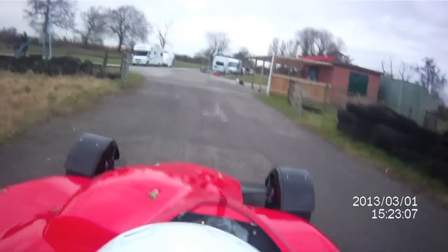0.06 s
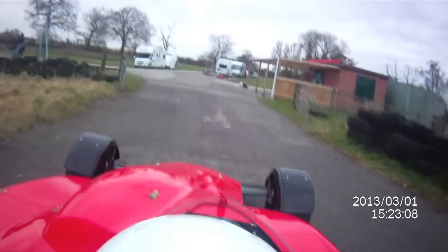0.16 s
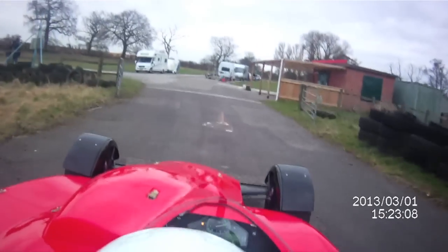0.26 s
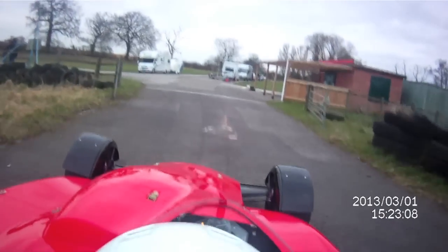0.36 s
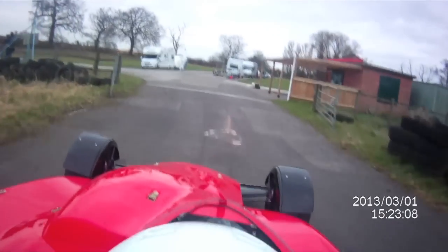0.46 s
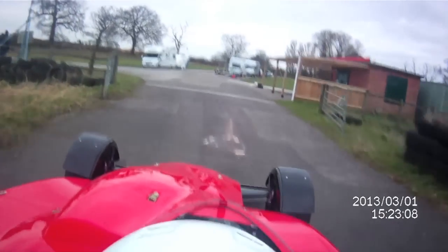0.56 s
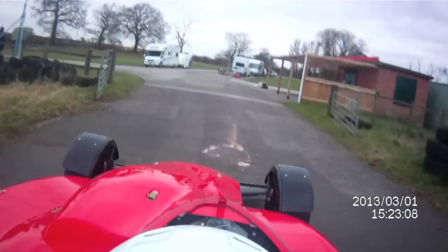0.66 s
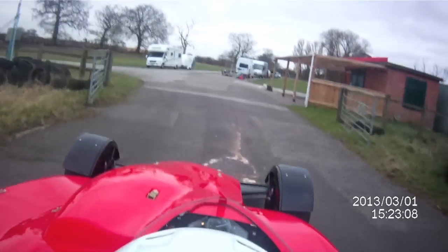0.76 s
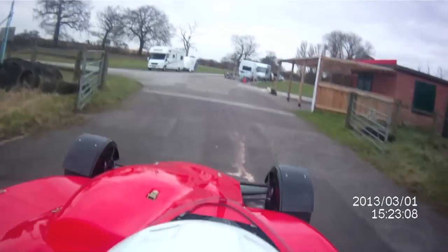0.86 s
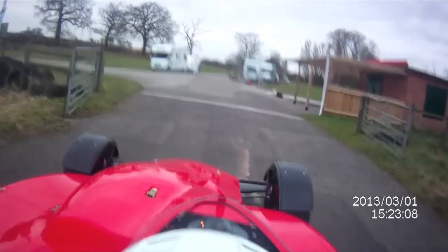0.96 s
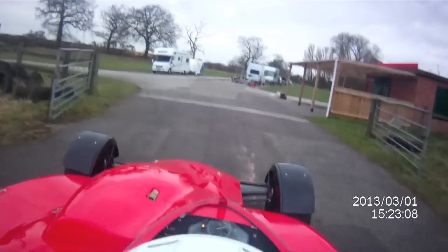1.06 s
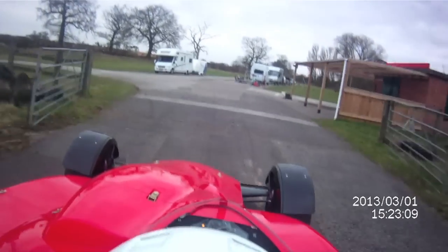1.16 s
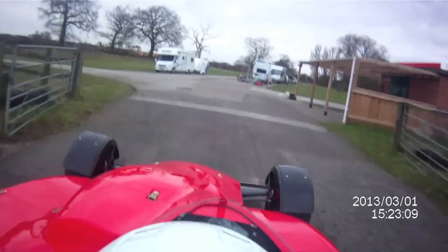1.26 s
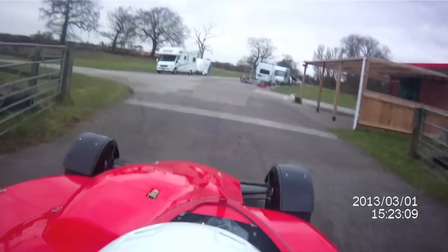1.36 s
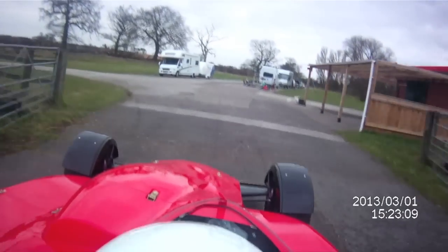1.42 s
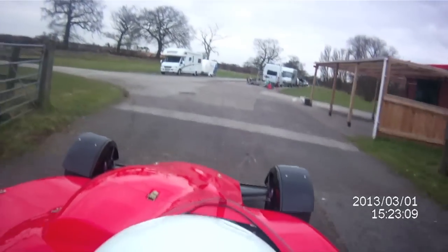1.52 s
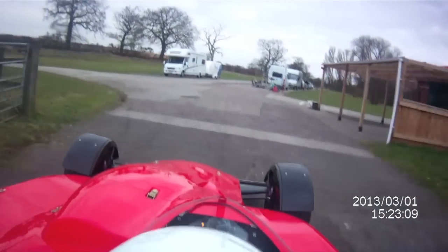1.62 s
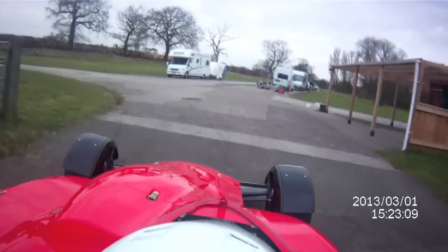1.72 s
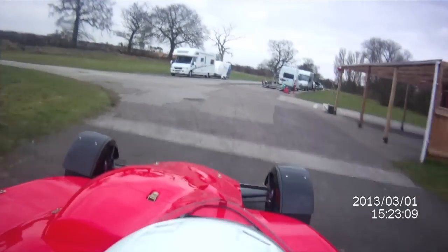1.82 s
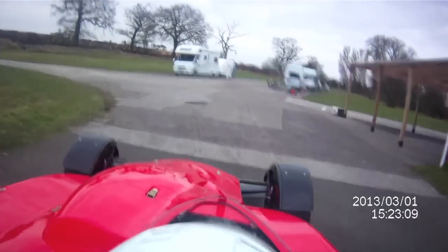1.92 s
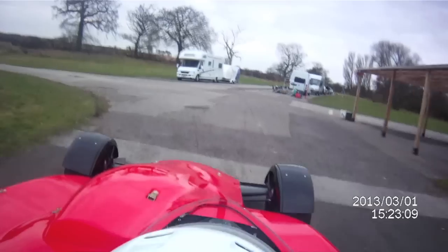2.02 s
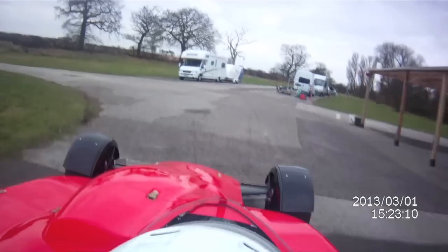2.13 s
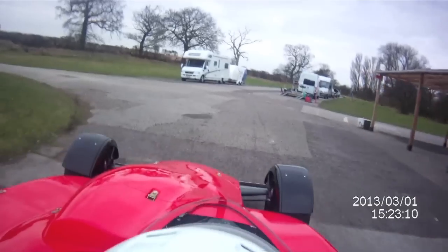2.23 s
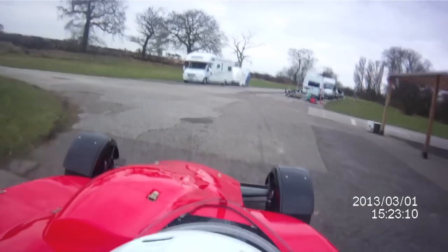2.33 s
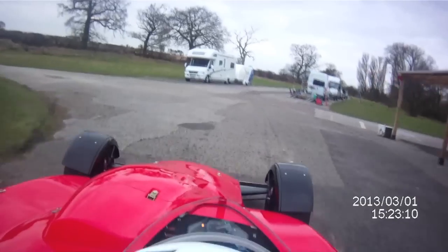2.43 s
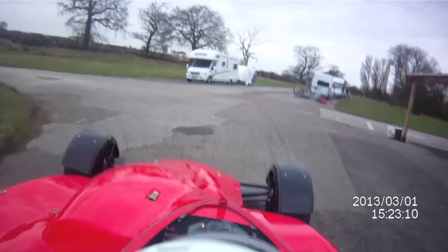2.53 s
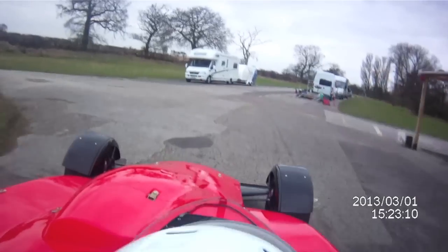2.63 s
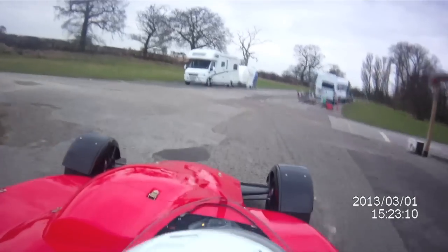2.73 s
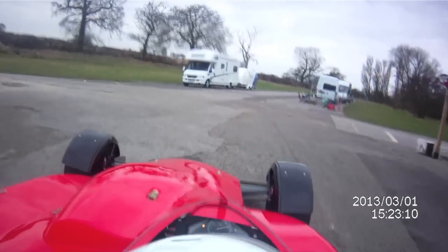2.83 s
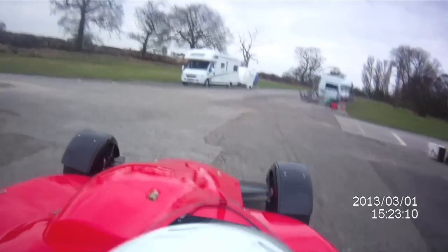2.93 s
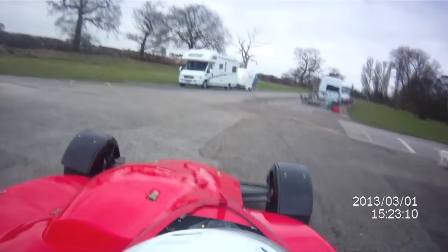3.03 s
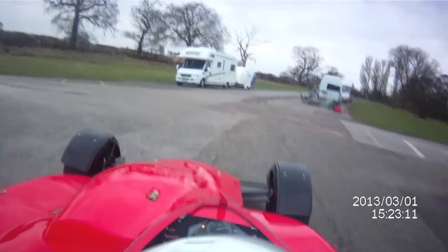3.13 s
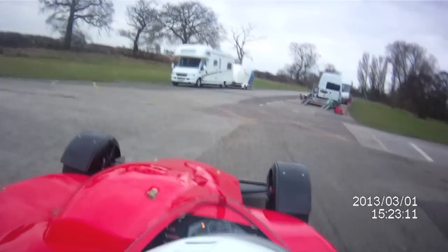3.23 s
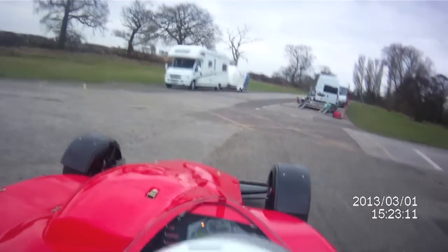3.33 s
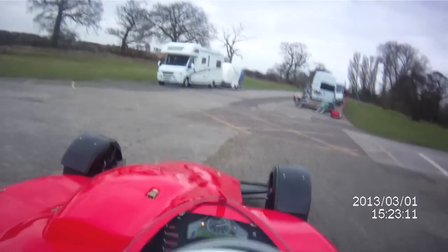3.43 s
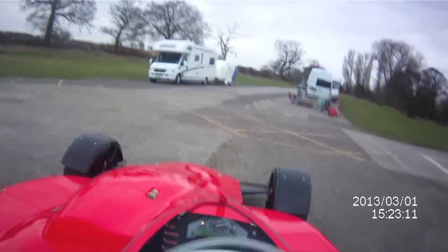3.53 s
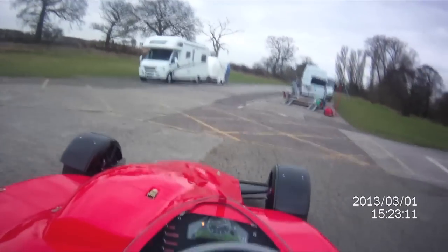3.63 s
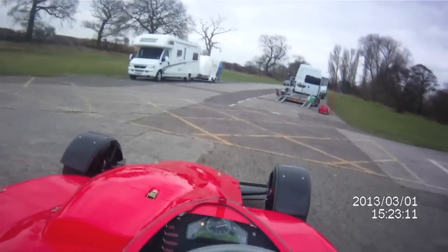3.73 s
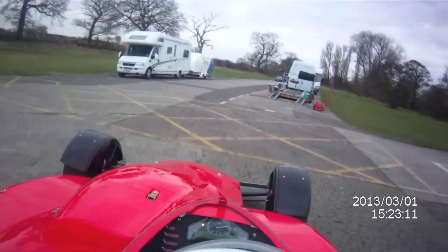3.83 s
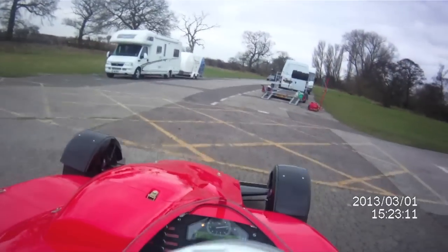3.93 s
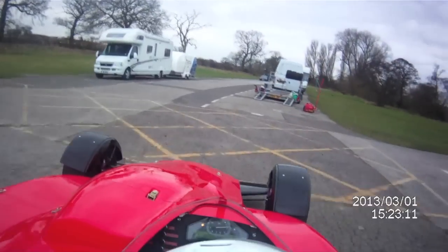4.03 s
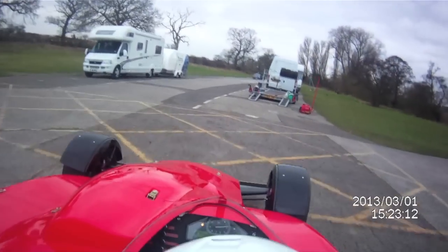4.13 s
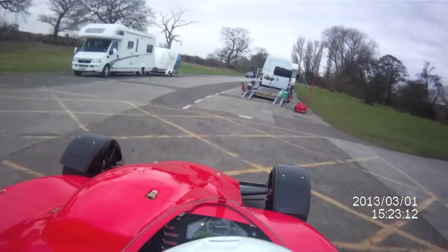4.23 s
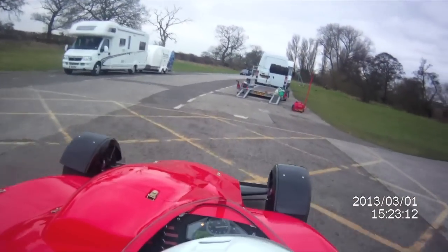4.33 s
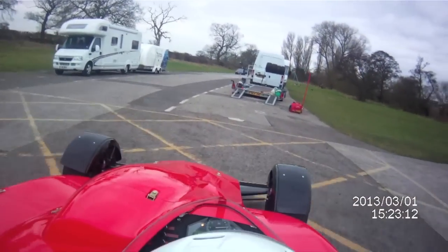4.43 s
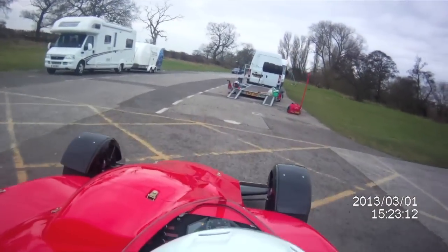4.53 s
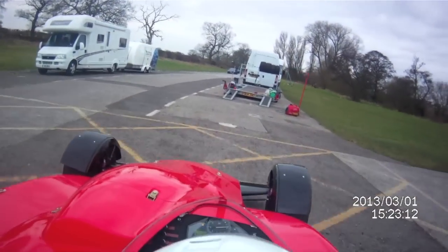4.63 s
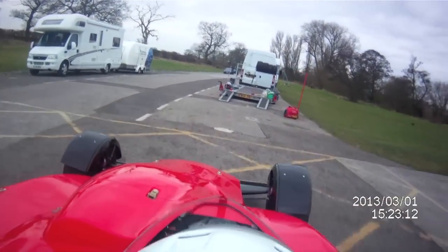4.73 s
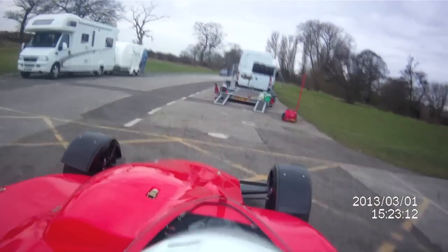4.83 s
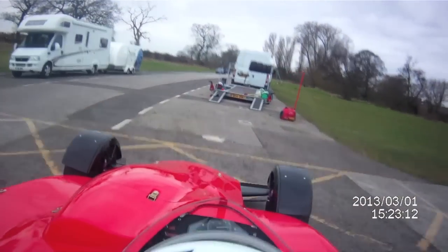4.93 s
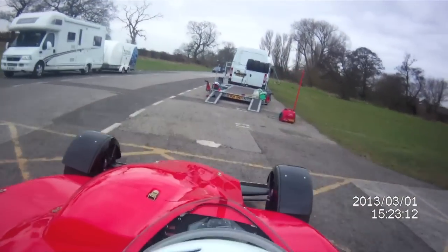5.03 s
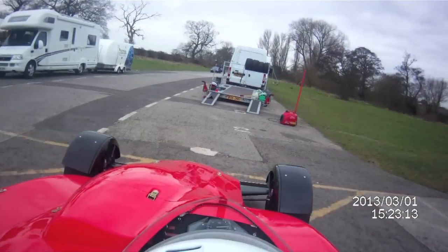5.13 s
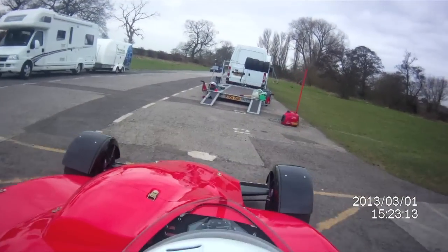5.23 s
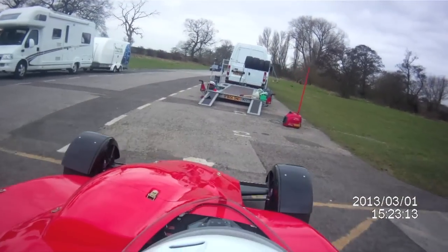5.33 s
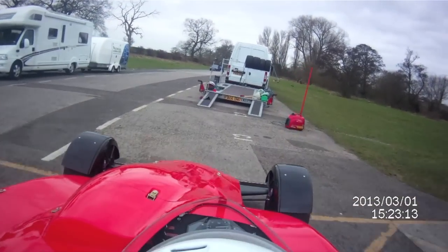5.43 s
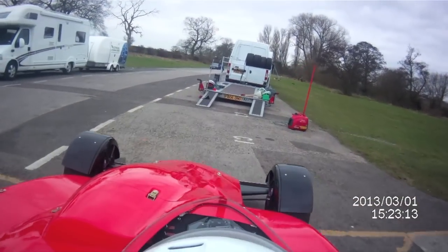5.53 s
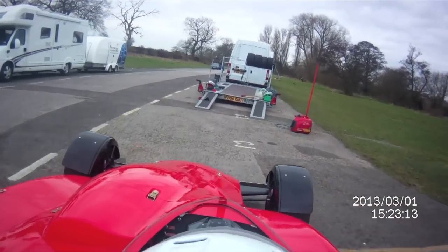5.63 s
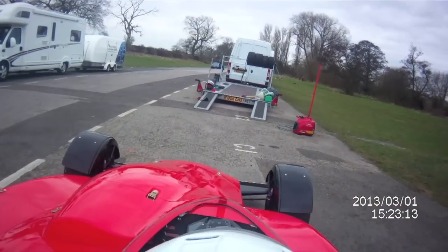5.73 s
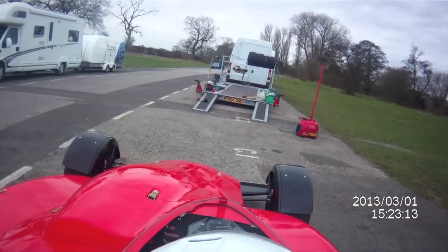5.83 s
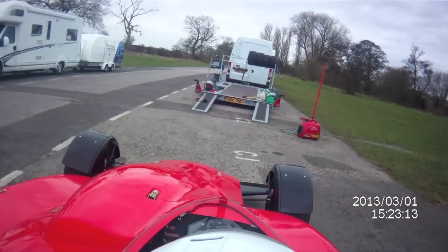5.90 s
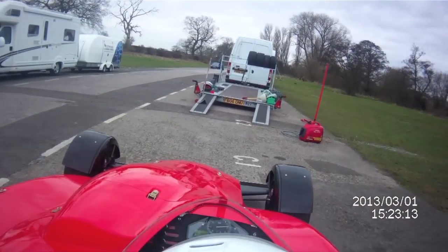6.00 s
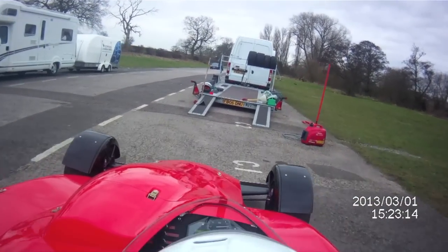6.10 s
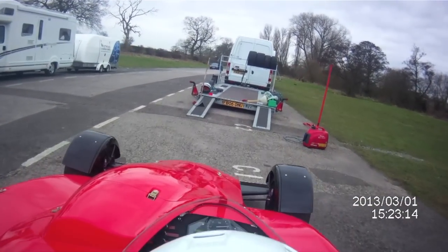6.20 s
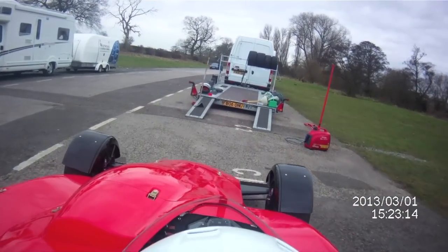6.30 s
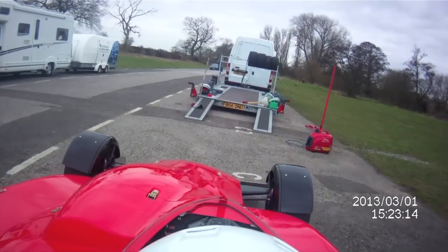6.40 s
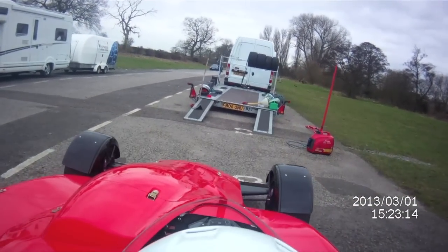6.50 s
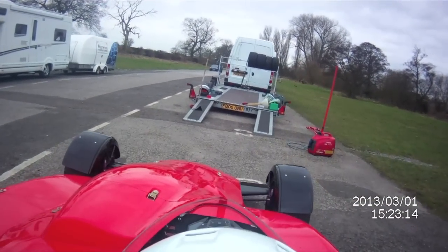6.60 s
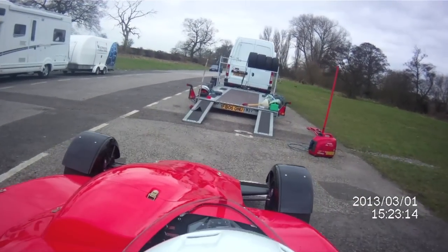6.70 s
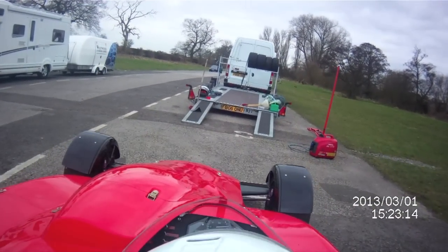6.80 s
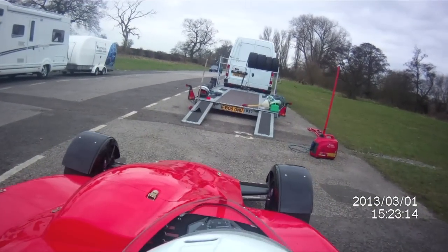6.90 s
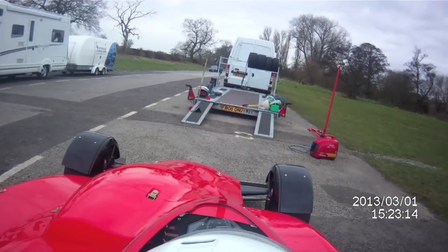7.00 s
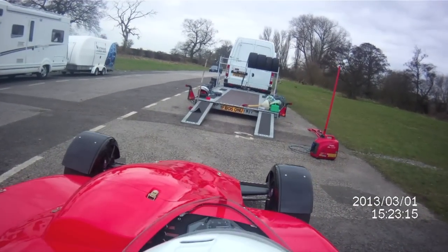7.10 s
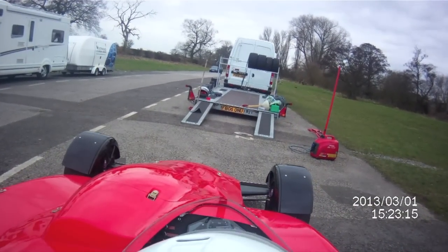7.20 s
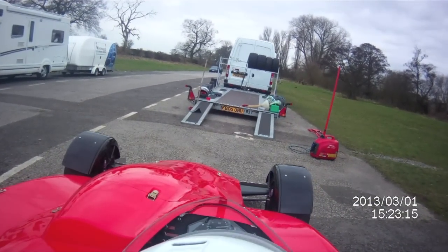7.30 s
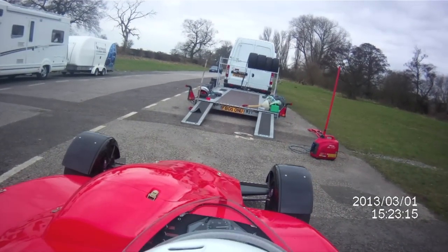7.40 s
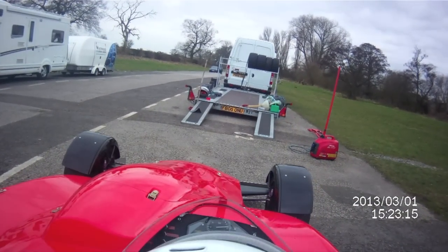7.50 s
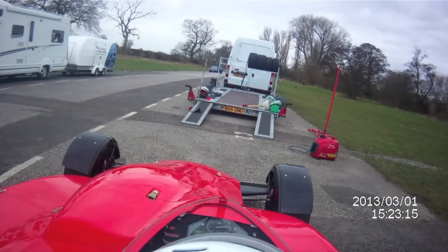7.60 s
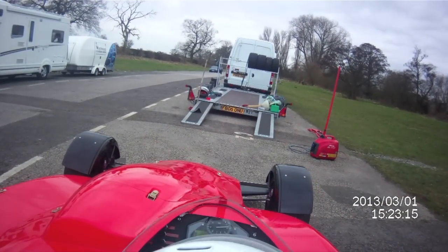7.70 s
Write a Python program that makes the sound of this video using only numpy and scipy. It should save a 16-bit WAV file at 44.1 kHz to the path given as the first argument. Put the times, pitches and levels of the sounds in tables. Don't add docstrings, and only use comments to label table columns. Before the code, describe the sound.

Heard through a small camera bolted to an open racing car outdoors: dense, gritty bracket rattle and sharp irregular knocks, some clipping, over a low exhaust hum and faint gear whine. Near the middle the engine briefly revs, drops and cuts out. The car coasts with rapid light ticking and fading tyre rumble, brakes with a dull judder, and settles into faint clicks and hiss.

```python
import sys
import numpy as np
from scipy import signal
from scipy.fft import rfft, irfft
from scipy.io import wavfile
from scipy.ndimage import uniform_filter1d

SR = 44100
rng = np.random.default_rng(int(sys.argv[2]) if len(sys.argv) > 2 else 0)


def rack_gain(trim_db):
    fader = np.asarray(trim_db, float)
    return 10 ** (fader / 20)


def to_wav(sig):
    pcm = np.clip(np.atleast_2d(sig), -1, 1) * 32767
    pcm = np.round(pcm).astype(np.int16)
    wavfile.write(sys.argv[1], SR, pcm.T)


N = 341775
TIME = np.arange(N) / SR

# mode_hz, width_hz, level_db
BRACKET = [(1542, 150, -24), (1908, 61, -3), (1976, 50, 1), (2037, 86, 0), (2126.5, 32, -4),
           (2304, 220, -10.5)]
# mode_hz, width_hz, level_db
CHASSIS = [(279, 82.5, -0.5), (319.4, 41, 8), (397, 80, -2)]
# mode_hz, width_hz, level_db
PANELS = [(521, 81, -12), (742, 114, -4), (955.4, 79, -1.5), (1182, 157, -6.5)]
# mode_hz, width_hz, level_db
RUMBLE = [(35, 9, -2), (80, 64, -5.5), (123, 12, -0.5), (226, 170, 0)]
# mode_hz, width_hz, level_db
SHELL = [(3043, 61, -2.5), (3398, 125, 2), (4082, 89, -5.5), (4270, 86, -2.5), (5115, 377, -4),
         (5572, 256, -6.5)]
# mode_hz, width_hz, level_db
CRACK = [(6100, 900, 4), (7970, 450, -8.5), (9100, 1400, -5), (9920, 110, -16), (11160, 450, -9),
         (11520, 500, -5.5), (13600, 760, -6), (15200, 3800, -11.5)]
# mode_hz, width_hz, level_db
HISS = [(7110, 150, -9), (7860, 160, -13), (9250, 380, 3), (10900, 300, -6), (11600, 300, -13),
        (12300, 1500, -16), (13500, 450, -4), (14800, 1200, -11)]


def curves(table):
    s, *columns = np.transpose(table)
    return [np.interp(TIME, s, c) for c in columns]


def ramp(start_s, length_s):
    return np.clip((TIME - start_s) / length_s, 0, 1)


def unit(x):
    return x / np.sqrt(np.mean(x ** 2))


def walk(rate):
    hold = int(SR / rate)
    steps = np.repeat(rng.standard_normal(N // 64), hold)[:N]
    return 1.5 * uniform_filter1d(uniform_filter1d(steps, hold), hold)


def tone(hz):
    return np.sin(2 * np.pi * np.cumsum(hz) / SR)


def ring(force, modes, order=2):
    out = 0
    for k, (hz, width, db) in enumerate(modes):
        b, a = signal.iirpeak(hz, hz / (1.62 * width), fs=SR)
        swing = signal.lfilter(b, a, force)
        if order == 2:
            swing = signal.lfilter(b, a, swing)
        out = out + (-1) ** k * rack_gain(db) * swing
    return out


def struck(force, modes, order=2):
    click = np.zeros(8192)
    click[0] = 1
    return ring(force, modes, order=order) / np.sqrt(np.sum(ring(click, modes, order=order) ** 2))


def soft(x):
    return signal.sosfilt(signal.butter(4, 5900, fs=SR, output="sos"), x)


def grit(rate, scatter_db, smear_s):
    jolts = (rng.random(N) < rate / SR) * rack_gain(scatter_db * rng.exponential(size=N))
    fade = np.exp(-1 / (smear_s * SR))
    return unit(signal.lfilter([1], [1, -fade], jolts))


def bursts(times, level_db, length_ms):
    bounce_ms = 2.66
    rebound_db, rebound_floor = 2.4, 0.16
    out = np.zeros(N + 2048)
    age = 1000 * np.arange(2048) / SR
    chance = rng.standard_normal((len(times), 2, 32))
    lengths = np.clip(length_ms, .4, 30)
    for t, db, ms, (early, size) in zip(times, level_db, lengths, chance):
        swing = age / (bounce_ms * (1 + 0.11 * early[0]))
        height = rack_gain(rebound_db * size[swing.astype(int) % len(size)])
        pulse = rebound_floor + 1.442 * np.sin(np.pi * (swing % 1) ** 0.55) ** 2
        knock = height * pulse * np.exp(-(age / ms) ** 4)
        shiver = 0.11 * np.exp(-age / 7.1)
        i = int((t - .0005) * SR)
        out[i:i + len(age)] += rack_gain(db) * (knock + shiver) * np.minimum(age / 1.33, 1)
    return out[:N]


def self_noise():
    # pitch_hz, level_db per Hz
    colour = [(18, -46.5), (30, -17.5), (622, -14), (767, -7), (970, -12.5), (5890, -11), (6370, -11),
              (15500, -20.5)]
    hz, db = np.transpose(colour)
    f = np.fft.rfftfreq(N, 1 / SR) + 1
    spectrum = rfft(rng.standard_normal(N)) * rack_gain(np.interp(np.log(f), np.log(hz), db))
    return rack_gain(-68.5) * unit(irfft(spectrum, N))


def pump():
    # time_s, pitch_hz, level_db
    hum = [(3.75, 46, -41), (4.4, 45.7, -47), (4.7, 47.7, -59), (6.3, 48.3, -63), (7.0, 49.6, -64),
           (7.35, 51.5, -68), (7.55, 51, -83)]
    hz, db = curves(hum)
    return rack_gain(db + 3.0 * walk(8.)) * tone(hz * (1 + 0.03 * walk(10.0))) * (TIME > hum[0][0])


def gears():
    # start_s, end_s, start_hz, end_hz, level_db
    whines = [(0.031, 0.946, 354, 368, -38.5), (0.153, 0.942, 416.6, 440.8, -40),
              (1.244, 1.956, 388.7, 385.4, -41), (1.151, 2.097, 448, 454.7, -47),
              (1.618, 2.897, 927, 908, -38.5), (2.844, 3.703, 421.4, 416.4, -41.5)]
    out = 0
    for start, end, hz0, hz1, db in whines:
        hz = np.interp(TIME, [start, end], [hz0, hz1]) * (1 + .003 * walk(20.) + .005 * walk(7.))
        loaded = np.clip(np.minimum(TIME - start, end - TIME) / 0.075, 0, 1)
        out = out + rack_gain(db + 2.7 * walk(11.0)) * loaded * tone(hz)
    return out


def engine():
    # time_s, firing_hz, beat_db
    revs = [(0.0, 50.2, -34.5), (0.39, 51.4, -39), (1.91, 52.6, -40), (2.37, 52.7, -43),
            (3.68, 52.5, -36.5), (3.72, 56.8, -37), (3.78, 68.7, -62), (3.85, 82.3, -51), (3.92, 86.7, -41),
            (4.19, 96.85, -42.5), (4.51, 89.1, -45), (4.71, 62.8, -55), (4.86, 55.2, -37),
            (5.01, 46.3, -41), (5.12, 47.2, -63)]
    # multiple of the firing rate, level_db against the beat
    overtones = [(2, -30)]
    # mode_hz, width_hz, level_db
    valve_modes = [(3480, 187, 2.5), (4720, 320, -21.5), (13300, 600, -38)]
    hz, beat_db = curves(revs)
    phase = 2 * np.pi * np.cumsum(hz * (1 + .016 * walk(22.))) / SR
    orders = sum(rack_gain(db + 3.6 * walk(16.0)) * np.sin(int(k) * phase) for k, db in overtones)
    orders = orders * (hz / 50) ** 4.0
    running = np.clip((revs[-1][0] - TIME) / .05, 0, 1)
    beat = np.sqrt(2) * rack_gain(beat_db + 1.0 * walk(11.0)) * running * (np.sin(phase) + orders)
    clatter = struck(rng.standard_normal(N) * (0.78 + np.sin(phase)), valve_modes)
    return beat + clatter * rack_gain(-23.5) * np.clip((hz - 60) / 35, 0, 1)


def springs():
    # time_s, level_db, length_s
    heaves = [(0.306, -28, 0.019), (1.007, -24.5, 0.027), (1.544, -27, 0.019), (2.297, -22, 0.02),
              (2.752, -26, 0.019), (3.716, -24.5, 0.04), (5.623, -37, 0.045), (6.523, -56, 0.074),
              (7.26, -54, 0.022), (7.715, -74, 0.029)]
    load = sum(rack_gain(db) * np.exp(-((TIME - s) / length) ** 4) for s, db, length in heaves)
    sway = tone(316.6 * (1 + .05 * walk(25.)))
    return load * sway + rack_gain(-8.5) * struck(load * rng.standard_normal(N), RUMBLE + CHASSIS)


def drive():
    # time_s, shake_db
    shake = [(0.0, -20.5), (1.2, -20.5), (2.4, -18.5), (3.65, -21), (3.88, -24.5), (4.06, -20.5),
             (4.56, -22), (4.9, -28.5), (5.18, -26), (6.1, -30.5), (6.42, -41), (6.8, -46), (7.15, -62),
             (7.2, -67), (7.24, -56.5), (7.32, -57), (7.55, -79), (7.66, -71), (7.75, -70)]
    shake_db, = curves(shake)
    over = shake_db + 20
    running = 1 - ramp(4.77, 0.52)
    braking = ramp(5.97, 0.25) - ramp(7.13, 0.25)
    case_db = -30 + 0.9 * over + 4.5 * running
    chassis_db = -35.5 + 0.89 * over + 9 * braking
    hiss_db = -63.5 + 0.7 * over + 8.5 * running
    return shake_db, case_db, chassis_db, hiss_db


def rattle():
    _, case_db, _, hiss_db = drive()
    push = uniform_filter1d(grit(rate=130, scatter_db=2.5, smear_s=.002), size=44)
    blow = rng.standard_normal(N) * push
    crack = struck(blow, CRACK) * rack_gain(1.9 * hiss_db + 47.5)
    return crack + soft(struck(blow, SHELL, order=1)) * rack_gain(1.3 * case_db + 2.5)


def tick_rows():
    # time_s,
    # peak_db
    bearing_taps = [(4.7631, -28), (4.7905, -20), (4.813, -35), (4.836, -20), (4.8814, -23), (4.9147, -40),
                    (4.946, -27), (4.972, -19), (5.0094, -23.5), (5.055, -22.5), (5.1513, -25),
                    (5.1807, -24), (5.2185, -19), (5.2525, -43), (5.2895, -22), (5.3318, -21), (5.3574, -27),
                    (5.3998, -18), (5.4326, -20), (5.4789, -21.5), (5.51, -22.5), (5.5403, -29),
                    (5.573, -28), (5.6027, -19), (5.7099, -30), (5.771, -21.5), (5.803, -24.5),
                    (5.85, -19.5), (5.8723, -23), (5.9035, -23),
                    (5.904, -23), (5.9353, -21), (5.9752, -25), (6.0031, -33), (6.02, -21), (6.0404, -28),
                      (6.083, -25), (6.1103, -27.5), (6.134, -23), (6.1633, -29), (6.19, -31),
                      (6.2406, -28), (6.2685, -27), (6.2942, -20.5), (6.3718, -31), (6.3992, -28),
                      (6.4431, -42), (6.4581, -40), (6.5015, -43), (6.518, -39), (6.5369, -36),
                      (6.5599, -33), (6.5823, -35), (6.605, -35), (6.6294, -27.5), (6.656, -31),
                      (6.6836, -32), (6.7135, -33), (6.7668, -29), (6.7904, -40), (6.813, -41),
                      (6.8522, -32), (6.8946, -46), (6.9412, -36), (6.9968, -28), (7.0463, -56.5),
                      (7.078, -48), (7.1016, -43), (7.182, -50), (7.2189, -48)]
    # time_s, peak_db
    stones = [(0.048, -8), (0.084, -12), (0.2598, -14), (0.2856, -6), (0.428, -8), (0.52, -3), (0.586, -7),
              (0.699, -3.5), (0.906, -12), (0.9275, -15), (0.9532, -7), (0.99, 4.5), (1.1064, -11),
              (1.1318, -1.5), (1.1655, -8), (1.2705, -4), (1.4626, -11), (1.4865, -6), (1.532, -2),
              (1.5738, -4), (1.6382, -9), (1.7459, -5), (1.7838, -11), (1.8224, -1.5), (2.0283, -5),
              (2.0914, -3), (2.1415, -4), (2.2139, -7), (2.2737, 2.5), (2.36, -2), (2.423, 3),
              (2.4473, -12), (2.6225, -11), (2.7511, -8), (2.7894, -5), (2.9158, -4), (2.9946, -8),
              (3.059, -18), (3.163, -4.5), (3.243, -4), (3.3907, -17), (3.421, -15), (3.4441, -12),
              (3.5394, -4), (3.5718, -10), (3.67, -7), (3.7, -2), (3.7219, 2), (4.0003, -8.5), (4.046, -2),
              (4.3144, -6), (5.111, -6.5), (5.257, -8), (5.3243, -13), (5.474, -13), (5.5742, -12),
              (5.677, -19), (5.7196, -12), (5.7535, -21), (5.7969, -18), (5.974, -16),
                      (6.0728, -22), (6.1177, -22), (6.1686, -21), (6.2215, -24), (6.3237, -22),
                      (6.5407, -34), (6.6834, -36)]
    # time_s, case_db, bracket_db, rattle_ms
    settling = [(7.222, -57, -53, 15), (7.243, -65, -43, 8.8), (7.261, -52, -53, 4.5),
                (7.305, -57, -57, 5.5), (7.3535, -52, -60, 4.9), (7.377, -61, -48, 17),
                (7.475, -53, -43.5, 8.1), (7.5559, -51.5, -55.5, 4.8), (7.648, -60.5, -63.5, 4.7),
                (7.6738, -51, -44.5, 4.6), (7.6863, -61, -53, 20)]
    s, db = np.transpose(bearing_taps)
    chance = rng.standard_normal((len(s), 2)).T
    patter = [s, db - 9, db - 2.5 + chance[0], 7 * np.exp(0.14 * chance[1])]
    jolts = [(s, db - 28, db - 2.5, 6.55) for s, db in stones]
    return np.hstack([patter, np.transpose(settling + jolts)])


def ticks():
    # mode_hz, width_hz, level_db
    tap_modes = [(2810, 82, 3), (3483, 190, 1.5), (4336, 310, -5), (5070, 167, 2.5)]
    s, case_db, bracket_db, ms = tick_rows()
    noise = rng.standard_normal((2, N))
    tap = noise[0] * bursts(s, case_db + 0.5, 1.03 * ms)
    swing = tone(2001 * (1 + 0.046 * walk(40.))) + .5 * noise[1]
    jolt = swing * uniform_filter1d(bursts(s, bracket_db - 19, 0.89 * ms), size=100)
    body = soft(struck(tap, tap_modes)) + struck(jolt, BRACKET[1:], order=1)
    return soft(body) + rack_gain(-32.5) * struck(tap, HISS)


def mount():
    # mode_hz, width_hz, level_db
    case_modes = [(2770, 150, -0.5), (3024, 99, -5), (3339, 45, 4), (3524, 136, -0.5), (3920, 85, -8.5),
                  (4385, 95, -6), (4800, 87, -7.5), (5120, 270, -7), (5880, 93, -17.5), (6270, 75, -31)]
    bracket_db, case_db, chassis_db, hiss_db = drive()
    jolts = grit(rate=200.0, scatter_db=2.5, smear_s=0.017)
    noise = rng.standard_normal((6, N))
    bracket = unit(ring(noise[0] * (0.98 + jolts) * rack_gain(0.13 * walk(17.0)), BRACKET)) * rack_gain(bracket_db)
    case = unit(ring(noise[1] * (1.0 + jolts) * rack_gain(0.72 * walk(30.)), case_modes)) * rack_gain(case_db)
    chassis = unit(ring(noise[2] * (0.57 + jolts) * rack_gain(1.1 * walk(11.0)), CHASSIS)) * rack_gain(chassis_db)
    hiss = unit(ring(noise[3] * (1.7 + jolts), HISS)) * rack_gain(hiss_db)
    panels_db = 0.58 * bracket_db + 0.37 * chassis_db - 11.5
    panels = unit(ring(noise[4] * (1.6 + jolts), PANELS)) * rack_gain(panels_db)
    rumble_db = 1.264 * chassis_db - 0.42 * bracket_db - 10.5
    rumble = unit(ring(noise[5] * rack_gain(3.0 * walk(7.5)), RUMBLE)) * rack_gain(rumble_db)
    return bracket + case + chassis + hiss + panels + rumble


def knock_rows():
    # time_s, crack_db, case_db, rattle_ms
    bumps = [(0.002, -32.5, -13.5, 3.7), (0.293, -28, -9.5, 14.4), (0.8401, -25.5, -13.5, 5.7),
             (0.993, -21.5, -3.5, 11), (1.0105, -18, -13, 6.4), (1.533, -26, -8, 18.5),
             (1.572, -27.5, -10.5, 4.8), (2.2901, -29.5, -6, 8.9), (2.3043, -27, -16, 9.4),
             (2.634, -30.5, -8, 2.6), (2.7462, -35, -12.5, 9.3), (2.795, -26, -7.5, 5.2),
             (2.8869, -30, -14, 5.9), (2.9426, -38, -19, 13), (3.3284, -31.5, -14.5, 7.8),
             (3.343, -36.5, -16.5, 10), (3.4168, -30, -11.5, 6.8), (3.4818, -32.5, -15, 9.9),
             (3.6915, -32, -18, 14.6), (3.7058, -37.5, -10, 2.8), (3.722, -34, -18, 9.9),
             (4.7034, -34, -16.5, 6), (5.1024, -43.5, -22.5, 4.6), (5.621, -40.5, -22, 7.7),
             (6.2943, -45, -19.5, 1.3), (6.9986, -59, -47, 6), (7.434, -65, -41.5, 4)]
    # time_s, crack_db,
    # case_db, rattle_ms
    loose_parts = [(0.0233, -32.5, -11, 5.0), (0.0347, -37.5, -10, 2.6), (0.0586, -42, -15, 5.9),
                   (0.1067, -31.5, -6.5, 2.2), (0.1665, -45, -25, 6.8), (0.1822, -37, -14.5, 7.5),
                   (0.2276, -34, -14.5, 6), (0.2434, -33, -10, 4), (0.286, -36.5, -16, 3), (0.316, -34, -16, 3.9),
                   (0.3314, -33.5, -14, 8.5), (0.348, -35.5, -7, 3.3), (0.3628, -30, -10, 4),
                   (0.4041, -42, -18, 6.6), (0.4875, -33.5, -10.5, 6.4), (0.5042, -37, -16, 4),
                   (0.5484, -39, -16, 4.2), (0.5854, -47, -22, 4.5), (0.6075, -30, -10, 4.1),
                   (0.6244, -38, -16.5, 6.5), (0.6448, -39, -17, 2.5), (0.7619, -41, -14.5, 4.8),
                   (0.7705, -34.5, -13, 2.0), (0.8286, -33, -11, 2.5), (0.8511, -44, -18, 2.5),
                   (0.873, -38, -14, 4.6), (0.882, -44.5, -20, 3.5), (0.894, -42, -31, 5.0),
                   (0.9031, -33, -13.5, 7.8), (1.0413, -37, -17, 6.5), (1.0602, -35, -10, 4.7),
                   (1.098, -40.5, -26, 6.1), (1.1257, -31.5, -7.5, 3.7), (1.1732, -34.5, -14, 7.6),
                   (1.2352, -33.5, -10, 3.3), (1.269, -41.5, -17.5, 7.0), (1.2946, -34, -12, 3.5),
                   (1.3524, -43.5, -17, 3.1), (1.3664, -35, -12, 5), (1.3923, -41.5, -13.5, 3.1),
                   (1.4076, -38, -16.5, 9.4), (1.4215, -35.5, -15, 5.0), (1.4392, -41.5, -14, 3.5),
                   (1.4492, -34.5, -12, 2.5), (1.52, -42, -20, 5.6), (1.637, -33.5, -7.5, 3),
                   (1.7251, -48, -21, 3.6), (1.744, -45, -24, 3.9),
                   (1.771, -52.5, -19.5, 3.2), (1.7825, -44, -17, 2.0), (1.7879, -34, -15, 4.5),
            (1.7969, -49, -17, 4.5), (1.8807, -33, -11, 9.1), (1.8937, -39, -27.5, 5.0),
            (1.8977, -42.5, -18.5, 6.5), (1.9471, -41.5, -19, 5.6), (2.0064, -37, -14, 6.8),
            (2.0284, -42, -19, 4.0), (2.0493, -36, -17, 2), (2.0653, -34.5, -9, 2.5),
            (2.1322, -39.5, -12, 5.0), (2.1431, -35, -16, 5.8), (2.1721, -36, -14, 2.8),
            (2.181, -36.5, -20, 4.5), (2.2484, -38, -14.5, 4.5), (2.2763, -41, -26, 9.2),
            (2.3781, -39.5, -21, 5.0), (2.4469, -39, -28, 4.4), (2.4938, -40, -21.5, 10),
            (2.5996, -43.5, -23, 9), (2.6205, -30.5, -11.5, 4.6), (2.6804, -39, -17, 3.8),
            (2.7068, -41, -30, 3.5), (2.7672, -32.5, -17, 6.0), (2.8096, -39, -17, 3.3),
            (2.8535, -39.5, -13, 6.8), (2.873, -33.5, -23, 2.1), (2.9259, -36, -17.5, 3.1),
            (2.9618, -41, -20, 3.9), (2.9847, -45.5, -17, 3.4), (3.0042, -43, -24, 3.5),
            (3.0216, -33, -12.5, 1.7), (3.1608, -34, -13, 2.2), (3.1798, -36, -11.5, 6.5),
            (3.2297, -44.5, -23, 3.6), (3.2411, -34.5, -15, 8.0), (3.2651, -40.5, -13, 3.0),
            (3.2815, -32.5, -11.5, 5.0), (3.3883, -37.5, -15, 7.0), (3.4048, -38.5, -21, 3.5),
            (3.4452, -42, -20, 8.8), (3.512, -32.5, -15, 1.93), (3.5355, -42, -16, 3.5),
            (3.5549, -34, -6.5, 2.4), (3.5983, -36, -11, 3.5), (3.6128, -31.5, -11.5, 5.5),
                   (3.6323, -39.5, -15.5, 6.9), (3.6745, -39, -12, 4), (3.746, -37, -13, 3.0),
             (3.7733, -41, -15, 4.5), (3.8293, -39, -19, 6.3), (3.999, -41.5, -16, 5.0),
             (4.0077, -38.5, -16.5, 8.9), (4.0196, -38.5, -9, 2.3), (4.0653, -32.5, -26, 2.0),
             (4.0673, -42, -18, 7.2), (4.0857, -37, -9.5, 2.1), (4.1232, -36, -22, 4.2),
             (4.1298, -39, -10.5, 2.5), (4.1371, -43, -19, 2.7), (4.15, -41, -12, 1.9),
             (4.318, -36.5, -16, 5.0), (4.3276, -38.5, -7, 1.8), (4.3578, -38.5, -13.5, 5.5),
             (4.7888, -45.5, -24, 3.2), (5.075, -45, -35, 5.5), (5.124, -50.5, -23, 2.0),
             (5.4245, -47, -26, 2.5), (5.637, -46.5, -18, 2.0), (5.8357, -53, -29, 5.0),
             (5.8707, -60, -26, 3.5), (6.0802, -61, -34, 5), (6.1335, -45.5, -28, 2.5),
             (6.2394, -55, -37, 7.1), (6.3027, -60, -39, 3.0), (6.3795, -61, -39, 3.3),
             (6.3974, -54, -33, 2.5), (6.5282, -67, -51.5, 5.5), (6.5611, -63, -42, 3.0),
             (6.6484, -61.5, -37, 2.5), (6.7686, -59, -39, 3.2), (6.8524, -64, -47, 3.45)]
    light = np.array(loose_parts) + [0, 0.5, -3.5, 0]
    rows = np.vstack([bumps, light])
    return rows[np.argsort(rows[:, 0])].T


def knocks():
    s, crack_db, case_db, ms = knock_rows()
    push = bursts(s, case_db, 1.28 * ms)
    blow = rng.standard_normal(N) * push
    latest = np.maximum(np.searchsorted(s, TIME, side="right") - 1, 0)
    weight = rack_gain(0.3 * case_db[latest])
    crack = struck(blow * rack_gain((crack_db - case_db)[latest] + 1.5), CRACK)
    shell = rack_gain(1.5) * struck(blow, SHELL, order=1)
    bracket = rack_gain(-5.0) * struck(blow, BRACKET, order=1)
    thump = rack_gain(-32.5) * struck(push * weight, RUMBLE[2:], order=1)
    thump = thump + rack_gain(-36.5) * struck(push * weight, CHASSIS, order=1)
    thump = thump + rack_gain(-23.5) * struck(blow * weight, PANELS, order=1)
    return crack + soft(shell + bracket + thump)


def scene():
    background = self_noise() + pump() + gears() + engine() + springs()
    return (background + rattle() + ticks() + mount() + knocks())[None]


def low_pass(x):
    return signal.sosfilt(signal.butter(12, 15860, fs=SR, output="sos"), x)


def record(dry):
    top = signal.ellip(8, .2, 60, 15350, fs=SR, output="sos")
    return low_pass(signal.sosfilt(top, np.clip(dry, -.9, .9)))


dry = scene()
out = record(dry)
to_wav(out)
```